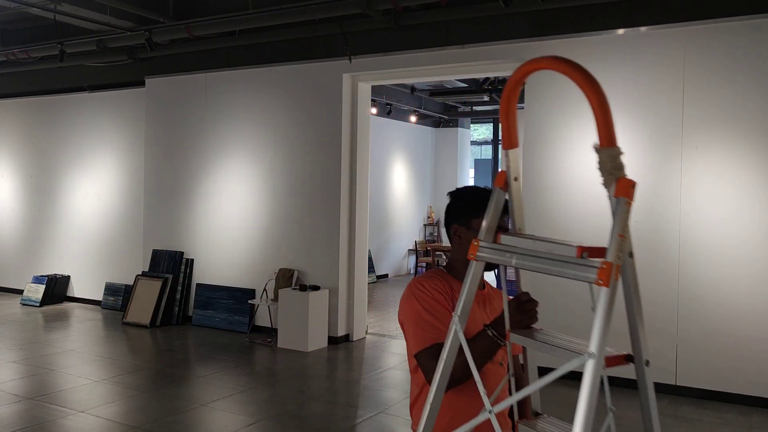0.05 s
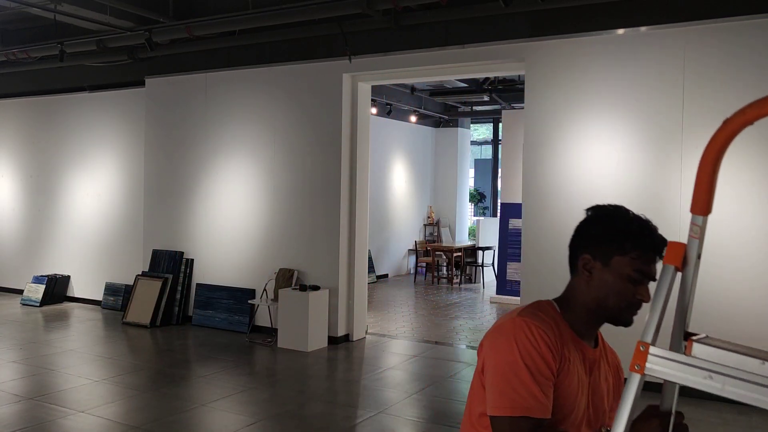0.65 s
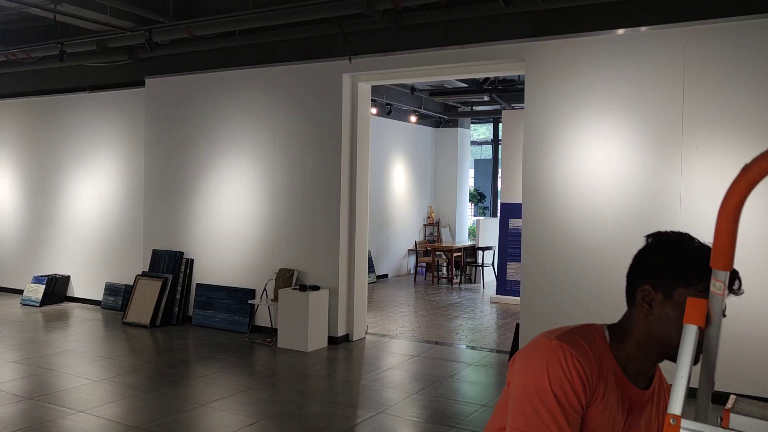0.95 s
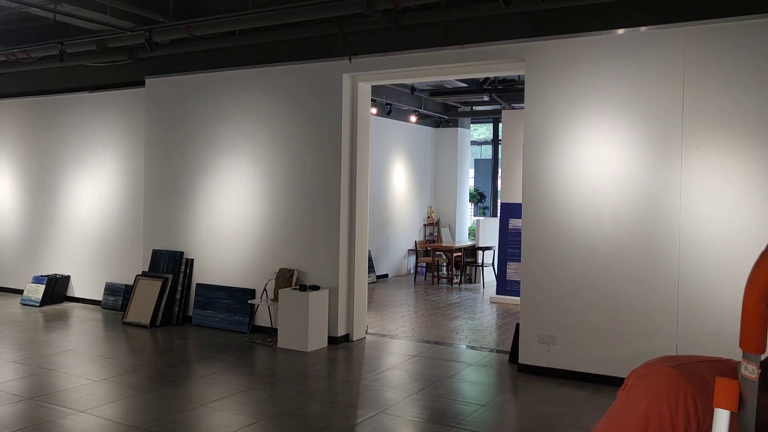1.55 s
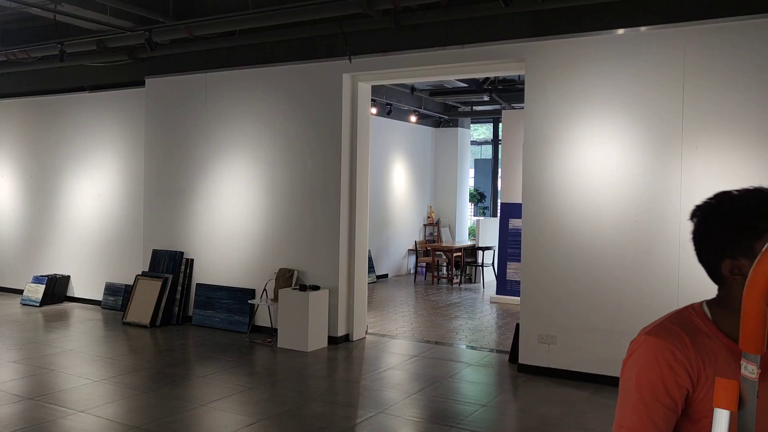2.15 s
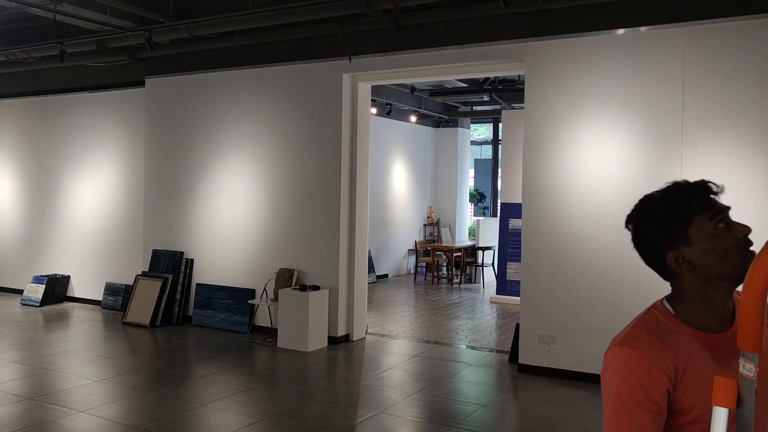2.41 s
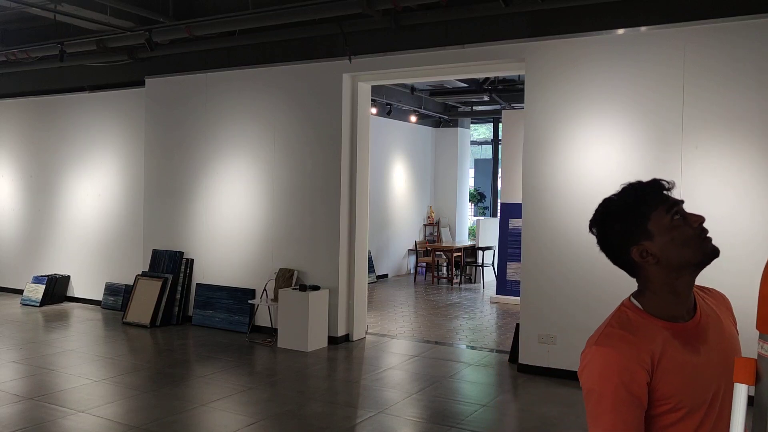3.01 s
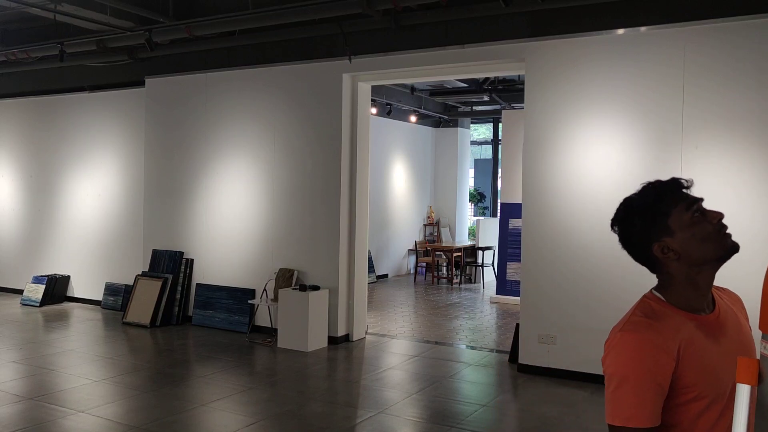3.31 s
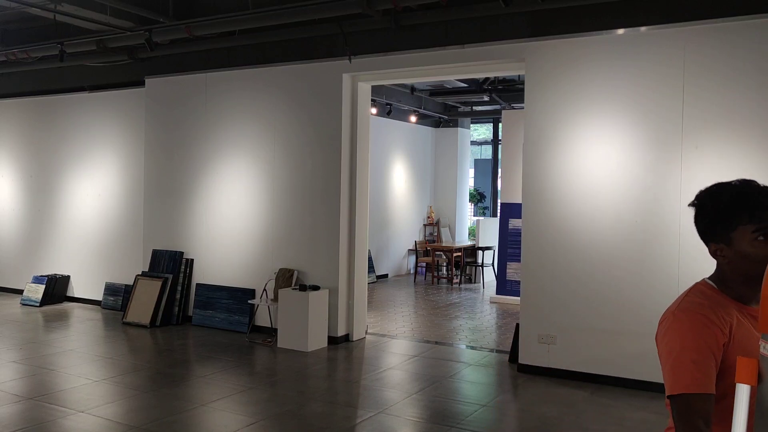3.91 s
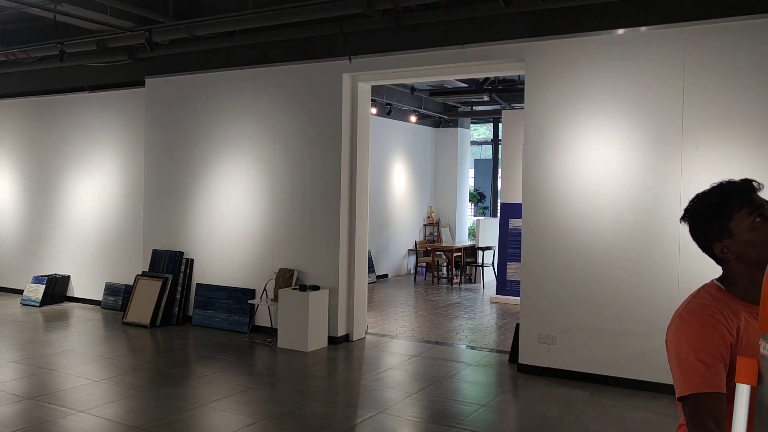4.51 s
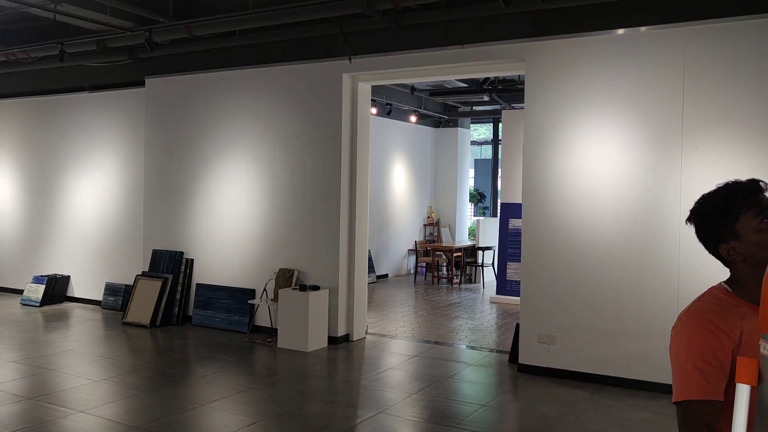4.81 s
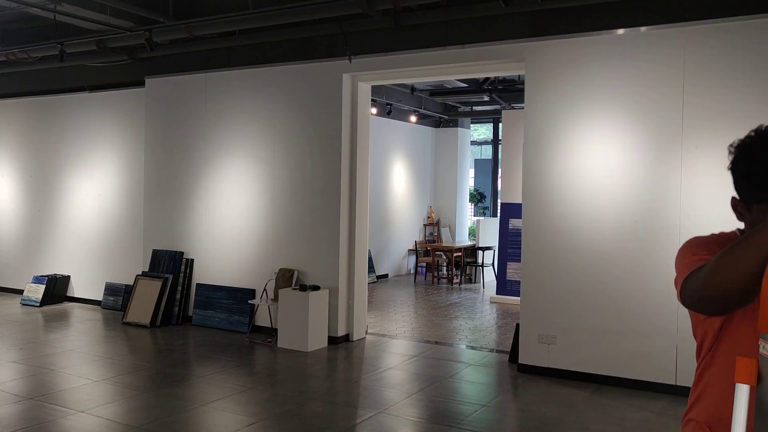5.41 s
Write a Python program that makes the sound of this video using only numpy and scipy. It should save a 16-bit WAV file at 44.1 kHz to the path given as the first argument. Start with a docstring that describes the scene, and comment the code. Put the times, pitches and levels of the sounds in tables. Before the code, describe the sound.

An aluminium stepladder is set down with two loud clatters in an echoing room, followed by lighter rattles, squeaks and clicks.

```python
"""An empty, echoing gallery with a tiled floor and faint ventilation.
An aluminium stepladder is carried across it and set down in two loud clatters: the blows set its rivets
chattering and its tubes ringing. It is then nudged into place: joints rattle, click and squeak, rubber
feet drag, shoes scuff and hands slide along the rails.
The microphone, a pair of small ports 16 cm apart, is to the left of the ladder."""
import sys
import numpy as np
from scipy import signal
from scipy.fft import rfft, irfft, next_fast_len
from scipy.io import wavfile
from scipy.ndimage import uniform_filter1d

SR = 44100
rng = np.random.default_rng(int(sys.argv[2]) if len(sys.argv) > 2 else 0)


def dump(signal):
    """Clip the signal to [-1, 1] and save it as 16-bit WAV at the path in sys.argv[1]."""
    limited = np.clip(np.atleast_2d(signal).T, -1, 1)
    pcm = np.round(limited * 32767).astype(np.int16)
    wavfile.write(sys.argv[1], SR, pcm)


N = 244755
TIME = np.arange(N) / SR


def from_db(db):
    """Decibels to gain."""
    return 10 ** (np.asarray(db) / 20)


def unit_energy(x):
    """Scale so that the squares sum to one, averaged over the channels."""
    return x / np.sqrt(np.mean(np.sum(x ** 2, axis=-1)) + 1e-20)


def at_hz(points, hz):
    """Read a table along a log-frequency axis."""
    known_hz, values = np.transpose(points)
    return np.interp(np.log(np.maximum(hz, 1)), np.log(known_hz), values)


def colour(x, spectrum):
    """Give a sound a smooth spectral shape."""
    size = next_fast_len(x.shape[-1] + 2048)
    gain = from_db(at_hz(spectrum, np.fft.rfftfreq(size, 1 / SR)))
    return irfft(rfft(x, size) * gain, size)[..., :x.shape[-1]]


def cut(x, edge_hz, kind, order=2):
    """Butterworth filter."""
    edge_hz = np.clip(edge_hz, 10, .45 * SR)
    return signal.sosfilt(signal.butter(order, edge_hz, kind, fs=SR, output="sos"), x)


def whiten(x):
    """Make every frequency equally strong, keeping its phase."""
    spectrum = rfft(x)
    return irfft(spectrum / (abs(spectrum) + 1e-12), x.shape[-1])


def even(noise, bins=61):
    """Level the chance peaks of a stereo noise so that no pitch stands out."""
    spectrum = rfft(noise)
    power = uniform_filter1d(np.mean(abs(spectrum) ** 2, axis=0), size=bins)
    return irfft(spectrum / np.sqrt(power + 1e-12), noise.shape[-1])


def add(track, start_s, sound):
    """Mix a sound into a track at a time."""
    start = max(round(start_s * SR), 0)
    track[..., start:start + sound.shape[-1]] += sound[..., :max(N - start, 0)]


def through(x, response):
    """Pass a sound through a stereo impulse response."""
    return signal.fftconvolve(np.atleast_2d(x), response, axes=-1)[:, :N]


def swell_and_fade(t, rise_s, fade_s):
    """A straight rise, then an exponential fall."""
    return np.minimum(t / rise_s, 1) * np.exp(-np.maximum(t - rise_s, 0) / fade_s)


def mode(hz, t60):
    """A tone of unit energy that dies by 60 dB in t60 seconds."""
    t = TIME[:SR]
    return unit_energy(np.cos(2 * np.pi * hz * t) * np.exp(-np.log(1000) * t / t60))


def chatter(decay_s, spread_db, size=SR // 2):
    """A dying burst of uneven micro-contacts with a flat spectrum and unit energy."""
    fade = np.exp(-TIME[:size] / (2 * decay_s))
    contacts = rng.standard_normal(size) * from_db(spread_db * rng.standard_normal(size)) * fade
    return unit_energy(whiten(contacts) * np.sqrt(fade))


def harden(burst, hardness_db, bass_hz=600, treble_hz=3200, bass_trade=.6):
    """A hard contact gains treble and gives up bass; a soft one is dull and heavy."""
    bass = cut(burst + 1e-18, bass_hz, "low", order=1)
    treble = cut(burst + 1e-18, treble_hz, "high", order=1)
    bass_db = -0.5 - bass_trade * hardness_db
    return burst + (from_db(bass_db) - 1) * bass + (from_db(hardness_db) - 1) * treble


def diffuse(size, common=0.83, spacing_m=.16):
    """Noise arriving from all sides: alike at both ports in the bass, unrelated in the treble."""
    alike = common * np.sinc(2 * np.fft.rfftfreq(size, 1 / SR) * spacing_m / 343)
    mid, side = rfft(rng.standard_normal((2, size)))
    return irfft(np.sqrt((1 + alike) / 2) * mid + np.sqrt((1 - alike) / 2) * side * [[1], [-1]], size)


def from_right(x, pan_db=0.5, lag_s=.00041):
    """A direct sound reaches the left port later and weaker."""
    delayed = np.interp(TIME - lag_s, TIME, x)
    return np.array([delayed * from_db(-pan_db), x * from_db(pan_db)])


def ventilation(level_db=-60.5):
    """Moving air gives a steady, low room tone from all around."""
    # Spectrum of the air. Each row: frequency in Hz, level in dB.
    air_spectrum = [(20, -1.5), (60, 0), (110, 3), (220, -6), (500, -2.5), (1000, -13), (2000, -16),
                    (3500, -22), (6000, -20), (9000, -25.5), (16000, -27)]
    noise = colour(diffuse(N), air_spectrum)
    return from_db(level_db) * noise / noise.std()


def gallery(x, build_s=0.0058, early_s=0.18):
    """Bare walls: echoes build over the first moments, then each band dies at its own rate."""
    # Length of the echo. Each row: frequency in Hz, seconds to fall 60 dB.
    echo_t60 = [(60, 1.5), (250, 1.7), (600, 1.62), (2000, 1.45), (4500, 1.22), (8000, 1.0), (11000, .78),
                (16000, .58)]
    # Colour of the echo. Each row: frequency in Hz, level in dB.
    echo_db = [(60, -5), (300, -1), (1000, 0.5), (3000, -4.5), (8000, -3), (15000, -10.5)]
    size = 2 * SR
    t, hz = TIME[:size], np.fft.rfftfreq(size, 1 / SR)
    early = np.exp(-t / early_s) + .02  # the early echoes count most in levelling the spectrum
    echoes = even(diffuse(size) * early) / early
    spectrum = rfft(echoes / echoes[:, :SR // 2].std())
    centres, response = np.geomspace(60, 16000, 14), 0
    for centre, share in zip(centres, np.eye(len(centres))):
        band = irfft(spectrum * at_hz(np.column_stack([centres, share]), hz), size)
        fade = (1 - np.exp(-t / build_s)) * np.exp(-np.log(1000) * t / at_hz(echo_t60, centre))
        response = response + from_db(at_hz(echo_db, centre)) * band * unit_energy(fade)
    return through(x, response)


def steps(roll_share=0.27):
    """Weight rolls onto the floor: the longer the thud, the softer its start."""
    # Shoes and ladder feet landing. Each row: start in seconds, strength in dB, decay in seconds.
    footfalls = [(0.0, -25, .3), (.425, -6.5, 0.12), (.70, -14.5, 0.12), (1.217, -11.5, 0.0075),
                 (1.458, -14.5, .008), (2.031, -12.5, 0.094), (2.17, -13.5, 0.16), (2.561, -16, 0.04),
                 (2.92, -16, 0.085), (5.328, -21, .065)]
    # Spectrum of a dull thud. Each row: frequency in Hz, level in dB.
    thud_spectrum = [(20, -8.5), (45, -1.5), (70, -4), (100, -3), (145, 1.5), (200, -10), (300, -11.5),
                     (800, -48.5), (3000, -67)]
    out = np.zeros(N)
    for start_s, db, decay_s in footfalls:
        roll = 1 - np.exp(-TIME[:SR // 2] / (roll_share * decay_s))
        thud = colour(chatter(decay_s, spread_db=2) * roll, thud_spectrum)
        add(out, start_s, from_db(db) * unit_energy(thud))
    return out


def rubs(grain_db=2.0, grain_s=.002):
    """Grainy friction: a soft surface gives a dull swish, grit on it adds a bright hiss."""
    # Soles, sleeves and hands rubbing. Each row: start, rise and fade in seconds, level in dB,
    # upper edge of the swish in Hz, grit against swish in dB.
    strokes = [(0.0, 0.06, 1, -58, 4770, -8.5), (.300, 0.037, 0.064, -43.5, 2670, -17),
               (.42, 0.035, 0.17, -46.5, 1930, -18), (.54, .092, 0.04, -55, 7000, -5),
               (1.035, 0.024, 0.11, -48.5, 1307, -43), (2.60, 0.29, .091, -45.5, 2780, -13.5),
               (4.447, 0.0097, 0.13, -41, 2920, 0), (4.862, .044, 0.075, -52.5, 11000, 15),
               (5.02, .017, 0.049, -54.5, 2800, -10), (5.095, .016, .19, -52.5, 5370, 2),
               (5.31, 0.011, 0.29, -55, 14000, 8)]
    # Colour of the friction. Each row: frequency in Hz, gain in dB.
    friction_spectrum = [(60, -18), (250, -6.5), (550, -1.5), (1200, -2.5), (2200, -2.5), (3200, -5),
                         (5000, -1.5), (9000, -3.5), (16000, -14.5)]
    out, t = np.zeros((2, N)), TIME[:SR]
    for start_s, rise_s, fade_s, db, top_hz, grit_db in strokes:
        grains = from_db(grain_db * np.interp(t / grain_s, np.arange(SR), rng.standard_normal(SR)))
        swish = cut(diffuse(SR), top_hz, "low", order=3)
        grit = from_db(grit_db) * diffuse(SR)
        hiss = colour(swish + grit, friction_spectrum) * grains
        add(out, start_s, from_db(db) * swell_and_fade(t, rise_s, fade_s) * hiss / hiss.std())
    return out


def drags(slips_per_s=280.0, spread_db=3.0):
    """The ladder's feet stick and slip unevenly and set the hollow legs droning."""
    # Rubber feet dragging over the tiles. Each row: start and length in seconds, strength in dB.
    pushes = [(2.602, 0.44, -40), (2.923, 0.1, -42), (4.653, 0.1, -50.5), (4.932, 0.039, -55),
              (5.331, 0.054, -42.5)]
    # Resonances of the legs. Each row: frequency and width in Hz, level in dB.
    leg_modes = [(143, 15, -8.5), (235, 38, -3.5), (312, 31, 5), (417, 59, 2), (524, 24, 2)]
    legs = sum(from_db(db) * mode(hz, np.log(1000) / (np.pi * width)) for hz, width, db in leg_modes)
    force = np.zeros(N)
    for start_s, length_s, db in pushes:
        slipping = rng.random(SR) < slips_per_s / SR
        slips = slipping * from_db(-spread_db * rng.standard_normal(SR))
        push = np.sin(np.pi * np.minimum(TIME[:SR] / length_s, 1))
        add(force, start_s, from_db(db) * push * slips / slips.std())
    return signal.fftconvolve(force, unit_energy(legs))[:N]


def squeaks(waver_share=0.0098, judder_db=3.0, overtone_ratio=2.69, overtone_db=-5.5, limit_hz=9700):
    """A slipping pin sings a juddering note, and its second bending mode if that is below the limit."""
    # Joints sticking and slipping. Each row: start and length in seconds, pitch in Hz, level in dB.
    notes = [(2.398, 0.11, 12820, -47.5), (2.409, 0.017, 2053, -44), (2.456, 0.02, 3890, -33),
             (2.555, 0.022, 4940, -43), (2.649, 0.033, 3250, -41.5), (2.722, 0.046, 3294, -38),
             (2.805, 0.066, 3267, -39), (2.861, 0.041, 3270, -39.5), (3.207, 0.055, 3280, -46.5),
             (5.10, 0.047, 12850, -51), (5.142, .045, 12840, -44.5), (5.25, 0.072, 12980, -40.5)]
    out, t = np.zeros(N), TIME[:SR // 4]
    for start_s, length_s, hz, db in notes:
        drift = uniform_filter1d(rng.standard_normal((2, len(t))), size=60)
        waver, judder = drift / drift.std()
        phase = 2 * np.pi * np.cumsum(hz * (1 + waver_share * waver)) / SR
        swell = np.sin(np.pi * np.sqrt(np.minimum(t / length_s, 1))) ** 2
        overtone = from_db(overtone_db) * np.sin(overtone_ratio * phase) * (overtone_ratio * hz < limit_hz)
        add(out, start_s, from_db(db + judder_db * judder) * swell * (np.sin(phase) + overtone))
    return out


def snaps(top_hz=11000):
    """Small parts click in the treble; the smaller the part, the higher its lower edge."""
    # Clicks and scratches of catches, caps and soles.
    # Each row: start in seconds, strength in dB, lower edge in Hz, decay in seconds.
    clicks = [(.435, -25, 7420, 0.028), (2.088, -21, 8600, 0.034), (2.556, -17, 9700, 0.0078),
              (3.165, -21.5, 7030, 0.013), (4.121, -26, 3010, .0032), (4.668, -36, 7900, .005),
              (4.704, -24, 7100, .003), (5.26, -28, 2960, 0.0016), (5.297, -5.5, 3940, 0.0036)]
    out = np.zeros(N)
    for start_s, db, low_hz, decay_s in clicks:
        click = cut(chatter(decay_s, spread_db=0.5) + 1e-18, low_hz, "high", order=7)
        add(out, start_s, from_db(db) * unit_energy(cut(click, top_hz, "low", order=1)))
    return out


def latch():
    """The metal spreader latch clinks as the landing shakes it, and later as it drops into place."""
    # Ring of the latch. Each row: frequency in Hz, level in dB, seconds to fall 60 dB.
    latch_modes = [(313, -5.5, 0.26), (1840, -4.5, 0.016), (2000, -4, 0.022), (2120, -2.5, 0.015),
                   (2490, -4.5, 0.021), (3200, -9.5, 0.016)]
    # Jolts to the latch. Each row: start in seconds, strength in dB, rattle decay in seconds.
    jolts = [(1.228, -2.5, .05), (4.122, -21.5, 0.0036)]
    clink = sum(from_db(db) * mode(hz, t60) for hz, db, t60 in latch_modes)
    out = np.zeros(N)
    for start_s, db, decay_s in jolts:
        add(out, start_s, from_db(db) * signal.fftconvolve(chatter(decay_s, spread_db=2.5), clink))
    return out


def rattles(count=60, contacts_per_s=55, contact_decay_s=0.0085, spread_db=1):
    """Force of loose treads and braces: a run of unevenly spaced contacts that swells and dies away."""
    # The frame rocking and settling. Each row: start, rise and fade in seconds, strength and
    # hardness in dB.
    runs = [(1.325, 0.031, 0.023, 9, -4.5), (1.555, 0.048, 0.095, 17.5, -0.5),
            (2.605, 0.077, 0.11, 0.5, -4.5), (2.92, 0.026, 0.09, -3.5, -4), (3.62, 0.2, 0.052, -30, 6)]
    force, t = np.zeros(N), TIME[:SR]
    for start_s, rise_s, fade_s, db, hardness_db in runs:
        contact_s = (np.arange(count) + rng.random(count)) / contacts_per_s
        energy = from_db(spread_db * rng.standard_normal(count)) ** 2
        contacts = np.bincount((contact_s * SR).astype(int), energy, SR)[:SR]
        power = signal.lfilter([1], [1, -np.exp(-1 / (contact_decay_s * SR))], contacts)
        buzz = np.sqrt(power) * rng.standard_normal(SR) * swell_and_fade(t, rise_s, fade_s)
        add(force, start_s, from_db(db) * harden(unit_energy(buzz), hardness_db))
    return force


def blows():
    """Force on the frame: each blow sets loose rivets chattering."""
    # Knocks on the feet and joints. Each row: start in seconds, strength and hardness in dB,
    # chatter decay in seconds.
    knocks = [(1.217, 7, 1.5, 0.011), (1.227, 12, 0, .011), (1.246, 11, 2, 0.0096), (1.283, 8, 0.5, 0.0085),
              (1.460, 10.5, -13.5, 0.0055), (1.464, 18, 4, 0.015), (1.505, 3, 9, 0.0056),
              (1.523, 4, 9, 0.01), (2.175, -14.5, -10, 0.0053), (2.405, -11, -7, 0.043),
              (2.459, -6.5, -7, 0.013), (2.478, -8, -8, 0.0075), (2.557, -2, -2, 0.026),
              (2.809, -2.5, -6, 0.014), (2.856, -5, 0, 0.0051), (3.207, -9, -3.5, 0.017),
              (4.122, -15.5, -2.5, 0.0047), (4.668, -15.5, -4.5, 0.013), (4.945, -27.5, 5.5, 0.0059),
              (5.357, -14, -8, 0.011), (5.515, -17.5, 4.5, 0.013), (5.538, -14.5, -2, .01)]
    force = np.zeros(N)
    for start_s, db, hardness_db, decay_s in knocks:
        add(force, start_s, from_db(db) * harden(chatter(decay_s, spread_db=7), hardness_db))
    return force


def ladder(force, clang_db=5.0, ring_db=-0.5):
    """The aluminium frame answers a force with a broad clang and the longer ring of its tubes."""
    # The crowd of short-lived modes. Each row: frequency in Hz, gain in dB.
    clang_spectrum = [(30, -36), (90, -16.5), (175, -10.5), (240, -3.5), (550, 0.5), (750, -1.5),
                      (1350, -0.5), (2000, 2), (3100, -4.5), (4800, -3.5), (6500, -6), (8300, -7.5),
                      (11500, -15), (16000, -21.5)]
    # Ring of the tubes and treads. Each row: frequency in Hz, level in dB, seconds to fall 60 dB.
    tube_modes = [(134.8, -30, 0.19), (229.8, -24, 0.27), (231, -29, 0.28), (321.4, -29, .6),
                  (439, -27.5, 0.45), (481.7, -25, .4), (538, -20, 0.31), (561.2, -22, 0.63),
                  (843, -35, 0.26), (1018, -23, 0.22), (1410, -30, .35), (1733, -25.5, 0.12),
                  (2050, -28, 0.21), (2224, -30, 0.14), (2551, -33.5, 0.26), (2350, -35.5, .2),
                  (3080, -29.5, 0.16), (4749, -36, 0.1), (8280, -34.5, .15)]
    tubes = sum(from_db(db) * mode(hz, t60) for hz, db, t60 in tube_modes)
    ring = signal.fftconvolve(force, tubes)[:N]
    return from_db(clang_db) * colour(force, clang_spectrum) + from_db(ring_db) * ring


def radiate(frame, direct_db=-6.0, scatter_db=-2.0, scatter_s=0.059):
    """Sound leaves the whole length of the ladder and glances off the floor and the near wall."""
    fade = np.exp(-np.log(1000) * TIME[:SR // 2] / scatter_s)
    glances = whiten(diffuse(SR // 2) * fade)  # hard surfaces return every pitch equally
    scatter = unit_energy(glances * fade ** .25)
    return from_db(direct_db) * from_right(frame) + from_db(scatter_db) * through(frame, scatter)


def scene():
    """Ladder and carrier reach the microphone directly and as the gallery's echo, over the room tone."""
    frame = ladder(blows() + rattles())
    feet, friction, thuds = drags(), rubs(), steps()
    catch, clicks, joints = latch(), snaps(), squeaks()
    # each source with its level into the room in dB
    sends = [(frame, -0.5), (feet, -5), (friction[1], 1.5), (thuds, -2),
             (catch, 2), (clicks, -6.5), (joints, -7)]
    into_room = sum(from_db(db) * source for source, db in sends)
    near = radiate(frame) + from_right(feet + thuds + catch + clicks + joints) + friction
    return near + gallery(into_room) + ventilation()


def record(dry, ceiling=.88, cutoff_hz=15850):
    """Each port colours the treble in its own way; peaks are rounded and the top is cut steeply."""
    # Responses of the two microphone ports. Each row: frequency in Hz, gain in dB.
    left_port = [(100, 2), (400, -0.5), (2000, 3.5), (4000, 1.5), (6000, -3), (6800, -3.5), (7700, 8),
                 (8400, 12), (9200, 7.5), (10700, 3.5), (11400, -2.5), (12200, 3.5), (15500, -1.5)]
    right_port = [(100, 1.5), (400, 1), (2000, 3.5), (4000, 4.5), (5900, 2.5), (6600, -0.5), (7400, -17),
                  (8200, -15), (8800, -14), (10500, -6), (12000, -5), (15500, 3)]
    ports = np.array([colour(dry[0], left_port), colour(dry[1], right_port)])
    rounded = ports / (1 + (ports / ceiling) ** 6) ** (1 / 6)
    return signal.sosfilt(signal.ellip(10, .2, 70, cutoff_hz, fs=SR, output="sos"), rounded)


dry = scene()
out = record(dry)
dump(out)
```